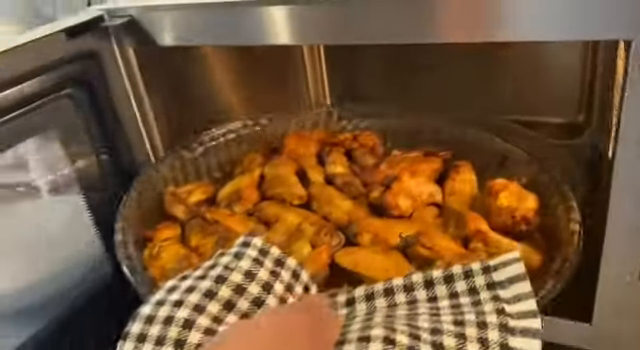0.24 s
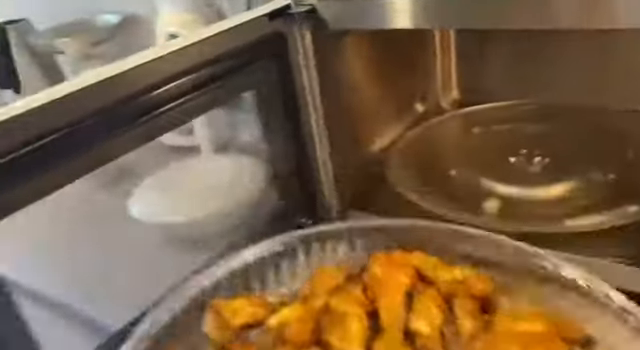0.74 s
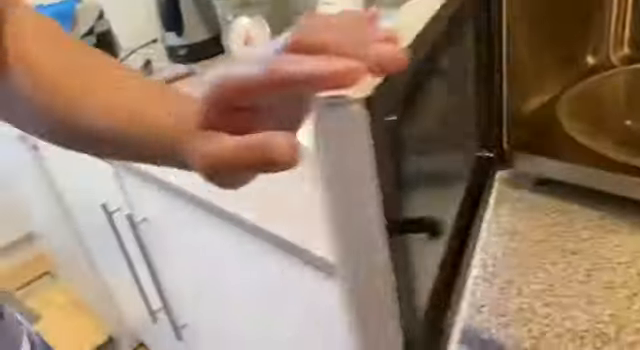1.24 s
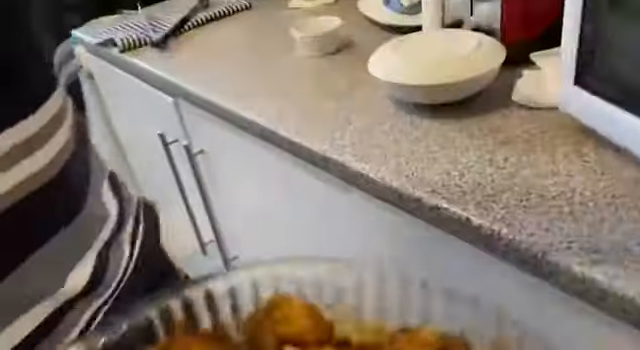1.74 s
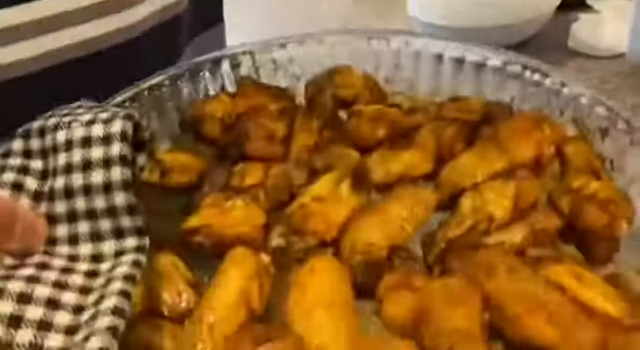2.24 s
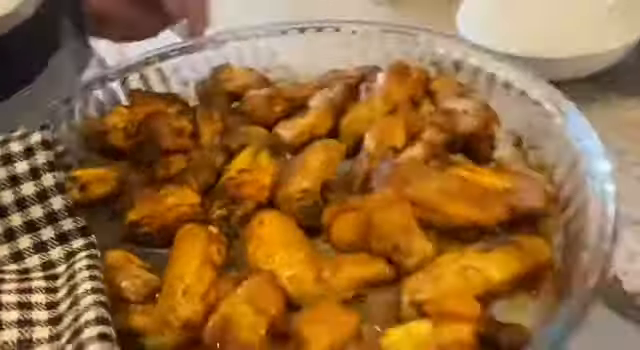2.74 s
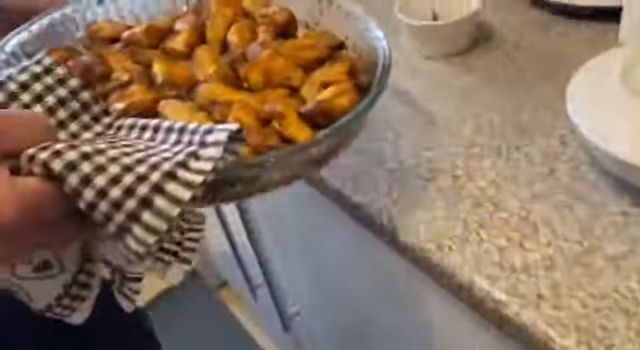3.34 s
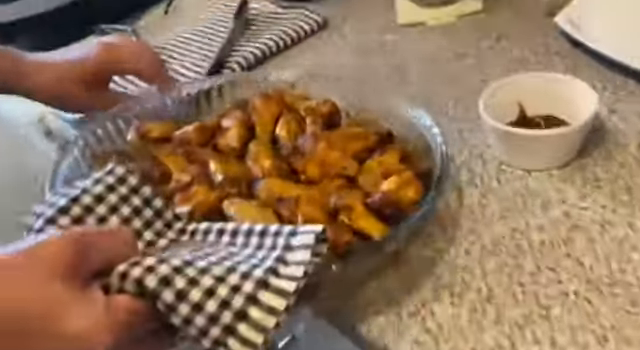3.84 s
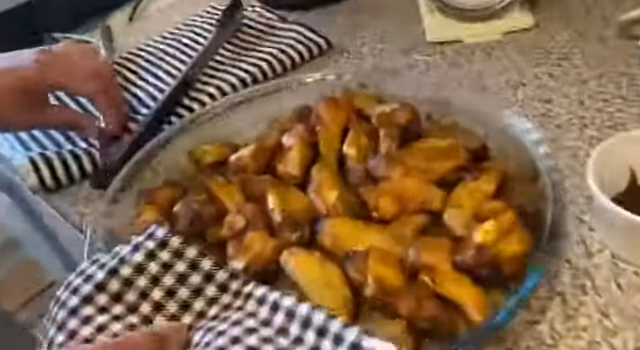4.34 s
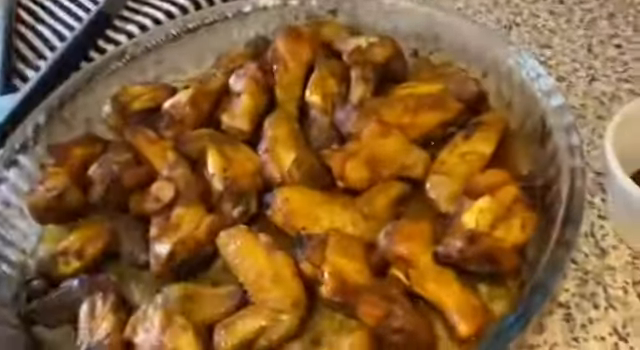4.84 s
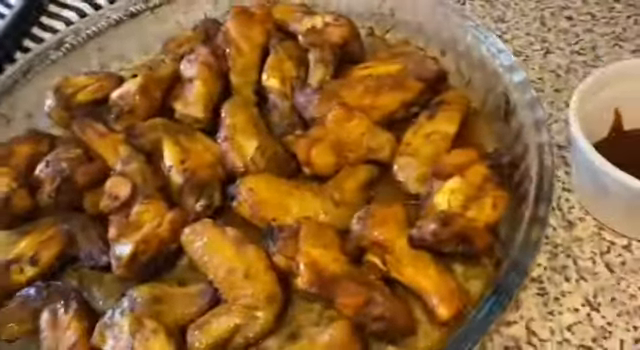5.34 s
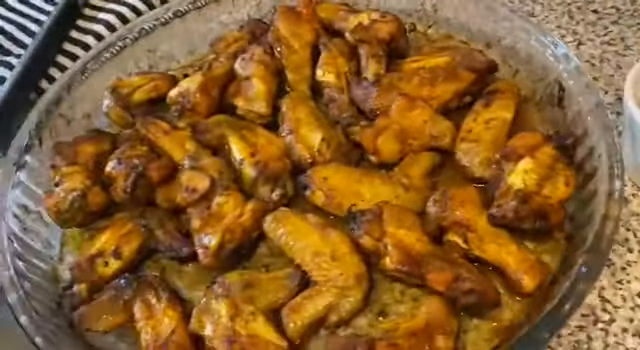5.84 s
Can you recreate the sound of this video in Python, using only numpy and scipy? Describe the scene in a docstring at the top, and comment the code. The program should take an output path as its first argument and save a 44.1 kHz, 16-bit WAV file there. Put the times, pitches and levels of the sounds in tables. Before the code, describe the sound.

A steady wavering microwave fan hum in a kitchen, a hard door clack at two seconds, cloth rustles, then a heavy glass dish knocks onto the worktop.

```python
"""Microwave oven, door and dish

A fan hums in a kitchen, as wavering sines under filtered noise, while a dish is carried from the oven in a cloth.
Soft floor thuds and cloth strokes are swells of noise; small clinks are noise clicks with brief dying sines.
The door's latch, panel and case, and the dish's two knocks on the worktop, are struck modes with a dense clatter.
The dish lands near a corner where the hum booms; a short diffuse tail gives the kitchen's ring."""
import sys
import numpy as np
from scipy import signal
from scipy.fft import rfft, irfft, next_fast_len
from scipy.io import wavfile

SR = 44100
rng = np.random.default_rng(int(sys.argv[2]) if len(sys.argv) > 2 else 0)


def pcm_store(signal):
    """Save signal as 16-bit PCM."""
    levels = np.round(np.clip(np.atleast_2d(signal), -1, 1) * 32767)
    wavfile.write(sys.argv[1], SR, levels.astype(np.int16).T)


N = 268555
EDGE_HZ = 11300  # upper limit of the noise and of the microphones


def amp(db):
    """Level and amplitude: decibels become a linear gain."""
    return 10 ** (np.asarray(db) / 20)


def evened(x):
    """Normalised power: scales a signal to an rms of 1."""
    return x / np.sqrt(np.mean(x ** 2) + 1e-20)


def read(points, hz):
    """Logarithmic pitch scale: interpolates a spectrum against log frequency."""
    f, value = np.transpose(points)
    return np.interp(np.log(hz + 1), np.log(f), value)


def curve(rows):
    """Linear interpolation in time: every column of a time table, sample by sample."""
    s, *columns = np.transpose(rows)
    return [np.interp(np.arange(N) / SR, s, column) for column in columns]


def add(mix, s, sound):
    """Superposition: mixes a stereo sound in at time s."""
    part = mix[:, max(round(s * SR), 0):][:, :sound.shape[1]]
    part += sound[:, :part.shape[1]]


def drift(rate_hz, size):
    """Low-passed random motion: slow noise of rms 1."""
    fast = next_fast_len(size)
    hz = np.fft.rfftfreq(fast, 1 / SR)
    slow = rfft(rng.standard_normal(fast)) / (1 + (hz / rate_hz) ** 4)
    return evened(irfft(slow, fast)[:size])


def decay(t, t60):
    """Exponential decay: a fall of 60 dB in t60 seconds."""
    return np.exp(-np.log(1000) * t / t60)


# Left-right likeness of the noise. Each row: frequency in Hz, correlation from 0 to 1.
LIKENESS = [(60, 0.94), (130, 1), (200, 0.53), (330, 0.69), (600, 0.094), (1200, 0.082), (2500, 0.37),
            (5000, 0.7), (7500, 0.02), (11000, 0.96)]


def noise(spectrum, size, tilt_db=0):
    """Partial coherence: shaped noise whose two channels share a set correlation at each frequency."""
    hz = np.fft.rfftfreq(size, 1 / SR)
    mid, side = rfft(rng.standard_normal((2, size)))
    same = np.clip(read(LIKENESS, hz), -1, 1)
    mid, side = mid * np.sqrt(1 + same), side * np.sqrt(1 - same)
    octaves = np.log2(np.maximum(hz, 1500) / 1500)  # the tilt acts above 1500 Hz
    colour = amp(read(spectrum, hz) + tilt_db * octaves)
    colour = colour * (hz < EDGE_HZ) * hz / (hz + 10)
    return evened(irfft(np.array([mid + side, mid - side]) * colour, size))


# How far echoes lift and dip the rush (dB), and the rough size of one lift (Hz wide, s long).
STANDING_DB, STANDING_HZ, STANDING_S = 2.5, 44, 0.18


def standing_waves(x, size=4096):
    """Interference: wall and cupboard echoes lift and dip narrow bands, shifting as the microphone moves."""
    overlap = size * 3 // 4
    hz, t, z = signal.stft(x, SR, nperseg=size, noverlap=overlap)
    across = np.fft.fftfreq(len(hz), hz[1])[:, None]
    along = np.fft.fftfreq(len(t), t[1])
    smooth = np.exp(-(across * STANDING_HZ) ** 2 * 2 - (along * STANDING_S) ** 2 * 2)
    grid = rng.standard_normal(smooth.shape)
    pattern = evened(np.fft.ifft2(np.fft.fft2(grid) * smooth).real)
    gain = evened(amp(STANDING_DB * pattern))
    return signal.istft(z * gain, SR, nperseg=size, noverlap=overlap)[1][:, :N]


# The walk from the oven to the corner.
# Each row: time in seconds, relative level of the fan's air rush in dB, relative level of the boom in dB.
WALK = [(0.0, -47.5, -46), (0.39, -47.5, -46.5), (1.49, -49.5, -49), (2.26, -51, -44.5), (2.95, -53, -43),
        (4.07, -50, -39.5), (4.71, -53, -37.5), (5.41, -51, -38), (6.09, -55, -39)]
# Spectra of the rush and the corner's boom. Each row: frequency in Hz, relative density in dB per Hz.
AIR_SPECTRUM = [(30, -0.5), (55, -4.5), (130, -11), (220, 1.5), (265, -2.5), (340, 0), (430, 0), (540, 3.5),
                (780, -2), (1100, -4), (1650, -8), (2400, -17), (6000, -29), (11000, -34)]
BOOM_SPECTRUM = [(25, -43), (50, -7), (85, -4.5), (112, -0.5), (138, 4), (170, -2.5), (220, -14),
                 (400, -16), (1000, -70)]


def air(rush_db=8.0, boom_db=-1.5, swirl_db=0.78):
    """Turbulence and room gain: the fan's rush fades with distance; its rumble builds up in the corner."""
    near_db, corner_db = curve(WALK)
    swirl = swirl_db * drift(25, N)
    rush = standing_waves(noise(AIR_SPECTRUM, N)) * amp(rush_db + near_db + swirl)
    boom = noise(BOOM_SPECTRUM, N) * amp(boom_db + corner_db)
    return rush + boom


SHAFT_HZ, MAINS_HZ, DRONE_HZ = 44.87, 49.9, 118.5
# Fan orders heard everywhere. Each row: multiple of the shaft rate, level in dB.
FAN_ORDERS = [(5, -62), (16, -67)]
# Mains hum. Each row: multiple of the mains frequency, level in dB.
MAINS = [(2, -62), (4, -51), (6, -61)]
# Fan orders that stand in the room. Each row: multiple of the shaft rate, relative level in dB
# with the door open, the same with it shut, dB gained per dB of boom.
FAN_STANDING = [(3, -50, -43, 1.0), (4, -40, -50.5, 1.0)]
# The second motor's drone: relative level in dB with the door open, with it shut, dB gained per dB of boom.
DRONE = (-48, -51, 3.04)
# The fan's whine along the walk. Each row: time in seconds, level of the 8th order in dB, of the 12th in dB.
WHINE = [(0, -46, -46), (.4, -50, -51.5), (1.3, -58, -58), (1.9, -61, -58), (2.45, -49.5, -54.5),
         (2.7, -54.5, -45), (3.0, -53.5, -49.5), (3.6, -48, -49.5), (4.1, -52.5, -63.5), (6.09, -53, -66)]
TONE_FALL = 1.1  # dB that the standing tones lose with distance per dB that the rush loses


def hum(waver=0.0015, flutter_db=1.15, wander_turns=0.065):
    """Harmonics and standing waves: shaft, mains and motor lines waver as the microphone moves in the room."""
    t = np.arange(N) / SR
    shaft_turns = SHAFT_HZ * np.cumsum(1 + waver * drift(8.3, N)) / SR
    near_db, corner_db = (level - level.mean() for level in curve(WALK))
    shut = np.clip((t - PANEL_BLOWS[0][0]) * 20, 0, 1)  # from the first panel blow, over 50 ms

    standing = [(DRONE_HZ * t, *DRONE)]
    standing += [(round(k) * shaft_turns, *levels) for k, *levels in FAN_STANDING]
    lines = []
    for cycles, open_db, shut_db, follow in standing:
        door_db = open_db + (shut_db - open_db) * shut
        lines.append((cycles, door_db + TONE_FALL * near_db + follow * corner_db))
    lines += [(round(k) * shaft_turns, db) for k, db in FAN_ORDERS]
    lines += [(round(k) * MAINS_HZ * t, db) for k, db in MAINS]
    lines += [(k * shaft_turns, db) for k, db in zip((8, 12), curve(WHINE))]

    out = np.zeros((2, N))
    for cycles, db in lines:
        phase = cycles + rng.random() + wander_turns * drift(3.9, N)
        gain = np.sqrt(2) * amp(db + flutter_db * drift(7.4, N))
        tone = gain * np.sin(2 * np.pi * phase)
        out += [np.roll(tone, shift=round(SR * 0.00032)), tone]  # reaches the right side first
    return out


# Soft footfalls. Each row: middle in seconds, Gaussian half-length in seconds, level in dB.
STEPS = [(0.782, .05, -48), (2.271, 0.051, -52), (3.316, 0.079, -47)]
# Spectrum of a footfall. Each row: frequency in Hz, relative density in dB per Hz.
FLOOR_SPECTRUM = [(20, -20), (45, 12), (75, -10), (150, -45), (600, -51)]


def footfalls():
    """Low-frequency impact: soft thuds as the floor takes the weight."""
    out = np.zeros((2, N))
    t = np.arange(SR // 2) / SR - 1 / 4
    for s, half, db in STEPS:
        swell = amp(db) * np.exp(-(t / half) ** 2 / 2)
        add(out, s + t[0], noise(FLOOR_SPECTRUM, len(t)) * swell)
    return out


# Cloth strokes, the firm ones mostly darker. Each row: middle in seconds, Gaussian half-length in seconds,
# relative level in dB, treble tilt in dB per octave, left minus right in dB.
RUSTLES = [(1.17, 0.03, -53, -2, -1), (1.91, 0.06, -51.5, -2, -1), (2.355, .04, -57.5, 1.5, 2),
           (2.422, 0.014, -61, 10, 1), (2.703, 0.045, -44.5, -4, 1.5), (2.888, 0.011, -53.5, -2, 2),
           (2.936, 0.023, -53, -2, 1), (3.027, 0.025, -51, -1, 1), (3.121, 0.024, -57.5, 2, 0),
           (3.23, 0.022, -58.5, 3, 2), (3.35, 0.017, -56, 2.5, 0), (3.465, 0.021, -47, -2.5, 1),
           (3.541, .012, -41, -11.5, -4), (3.574, 0.023, -42, -3.5, 1.5), (3.625, 0.015, -52, -3, -1),
           (3.684, 0.025, -48.5, -2.5, 3), (3.74, 0.019, -55, 0, 3), (4.069, 0.015, -50.5, 1, -3),
           (4.144, 0.016, -47, -4.5, -2), (4.185, 0.032, -48.5, -2.5, -2), (4.319, 0.012, -41, -7, -2),
           (4.4, 0.026, -47, -5.5, 1), (4.627, 0.035, -57, 4.5, 1), (4.954, .024, -52.5, 2.5, 1)]
# Spectrum of the cloth, and of the small clicks. Each row: frequency in Hz, relative density in dB per Hz.
CLOTH_SPECTRUM = [(200, 0), (700, -1), (1600, -0.5), (2400, 2.5), (4200, 1.5), (6500, -2.5), (11000, -6.5)]


def cloth(grain_db=1.5, catches_per_s=260, catch_db=0):
    """Stick-slip friction: swells of fibre hiss are roughened by threads that catch and let go."""
    out = np.zeros((2, N))
    t = np.arange(SR // 2) / SR - 1 / 4
    for s, half, db, tilt_db, left_db in RUSTLES:
        swell = np.exp(-(t / half) ** 2 / 2) * amp(db + grain_db * drift(180, len(t)))
        catches = (rng.random(len(t)) < catches_per_s / SR) * rng.random(len(t))
        snaps = signal.lfilter([1], [1, -np.exp(-1500 / SR)], catches)  # each catch dies away
        roughness = 1 + amp(catch_db) * snaps
        stroke = noise(CLOTH_SPECTRUM, len(t), tilt_db) * swell * roughness
        add(out, s + t[0], stroke * amp([[left_db / 2], [-left_db / 2]]))
    return out


def ring(modes, t):
    """Modal vibration: a struck object sounds as a sum of dying sines."""
    return sum(amp(db) * decay(t, t60) * np.sin(2 * np.pi * hz * t) for hz, db, t60 in modes)


# Small clinks of utensils and glass. Each row: start in seconds, relative level in dB,
# relative level of the ring in dB.
TICKS = [(0.7456, -27, -20), (3.005, -37, -23), (4.069, -42, -1), (4.139, -29, -18), (4.312, -36, 5),
         (4.321, -36.5, 5), (4.33, -38, 2), (4.374, -29.5, -15), (4.389, -26, -4.5), (4.507, -28.5, -13),
         (5.475, -35, -19)]
# The brief ring of a clink. Each row: frequency in Hz, relative level in dB, t60 in seconds.
CLINK_MODES = [(4200, -12, 0.027), (5570, -20, 0.049), (6970, -25, 0.063)]


def ticks(t60=0.0033, tilt_db=3):
    """Transient excitation: tiny bright clicks set off a brief modal ring, strong or faint."""
    out = np.zeros((2, N))
    t = np.arange(SR // 10) / SR
    for s, db, ring_db in TICKS:
        click = noise(CLOTH_SPECTRUM, len(t), tilt_db) * decay(t, t60) / 2
        add(out, s, amp(db) * (click + amp(ring_db) * ring(CLINK_MODES, t)))
    return out


CRACK_T60 = 0.018  # seconds for the first crack of a blow to die away


def strike(blows, modes, clatter, clatter_db, clatter_t60, crack_db, side_db):
    """Impact excitation: a blow cracks, then rings; its weight and hardness set the band that moves."""
    out = np.zeros((2, N))
    t = np.arange(SR // 2) / SR
    tones = ring(modes, t)
    fade = amp(clatter_db) * decay(t, clatter_t60) + amp(crack_db) * decay(t, CRACK_T60)
    for s, db, low_hz, high_hz in blows:
        dense = noise(clatter, len(t)) * fade
        weight = signal.butter(3, min(low_hz, SR / 3), "high", fs=SR, output="sos")
        hardness = signal.butter(6, min(high_hz, SR / 3), fs=SR, output="sos")
        add(out, s, amp(db) * signal.sosfilt(np.vstack([weight, hardness]), tones + dense))
    return out * amp([[side_db], [-side_db]])  # left up, right down by as much


# Modes of door and case. Each row: frequency in Hz, relative level in dB, t60 in seconds.
DOOR_MODES = [(62.4, -2, 0.089), (159.4, -6.5, 0.143), (193.6, -12.5, 0.1), (218.4, -23.5, 0.23),
              (384, -33, 0.13), (390, -6.5, 0.055), (720, -38, 0.086), (799, -7, 0.066), (834, -30, 0.12),
              (1070, -31, 0.12), (1106, -24, 0.26), (1273, -34, 0.19), (1440, -30, 0.22), (1502, -32, 0.28),
              (1560, -35, 0.14), (2330, -38, 0.07), (2434, -26, 0.08), (2630, -18, 0.079),
              (3000, -31, 0.061), (3240, -22.5, 0.11), (3370, -29, .11), (3620, -31, 0.1),
              (4320, -32, 0.059), (5250, -31, 0.087)]
# Their dense clatter. Each row: frequency in Hz, relative density in dB per Hz.
DOOR_CLATTER = [(50, 8.5), (150, -5), (300, 2), (480, 4), (800, 2), (1150, 0), (1700, -1), (2300, -3.5),
                (4000, -7.5), (5500, -11.5), (7500, -14.5), (11000, -7.5)]
# The latch hooks touch, ride up, snap in and rattle. Each row: start in seconds, relative level in dB.
LATCH_CLICKS = [(2.01, -15.5), (2.018, -21), (2.026, -23), (2.034, -13), (2.043, -10), (2.0473, -6.5),
                (2.082, -21.5)]
# The panel meets the frame and chatters. Each row: start in seconds, relative level in dB.
PANEL_BLOWS = [(2.0436, -4.5), (2.0629, -15), (2.069, -19), (2.084, -28), (2.094, -24), (2.106, -21.5),
               (2.131, -36), (2.204, -32)]
# The case is nudged, takes the slam and rocks to rest, duller at the end.
# Each row: start in seconds, relative level in dB, highest frequency in Hz.
CASE_THUDS = [(2.018, -14, 523), (2.0497, -3, 525), (2.0547, -10, 564), (2.109, -20, 625),
              (2.149, -21, 260), (2.178, -36, 250), (2.219, -23.5, 303)]
# Bands that latch and panel set moving: lowest and highest frequency in Hz.
LATCH_HZ = (920, 10060)
PANEL_HZ = (407, 3000)
CASE_LOW_HZ = 119  # the case hardly moves below this pitch


def door():
    """Band-limited impact: latch, panel and case blows excite one set of door modes in different bands."""
    blows = [(s, db, *LATCH_HZ) for s, db in LATCH_CLICKS]
    blows += [(s, db, *PANEL_HZ) for s, db in PANEL_BLOWS]
    blows += [(s, db, CASE_LOW_HZ, high_hz) for s, db, high_hz in CASE_THUDS]
    return strike(blows, DOOR_MODES, DOOR_CLATTER,
                  clatter_db=-8.0, clatter_t60=0.13, crack_db=-9.5, side_db=-0.5)


# Modes of the loaded dish on the worktop. Each row: frequency in Hz, relative level in dB, t60 in seconds.
DISH_MODES = [(116, -10, .165), (160, -19, .14), (230, -18, .2), (330, -15, .12), (398, -19, .12),
              (440, -6, .03), (478, -20, .1), (600, -2, .016), (662, -27, .14), (705, -19, .075),
              (778, -24, .13), (910, -23, .08), (1040, -9, .024), (1421, -29, .1), (2020, -22, .06)]
# Their dense clatter. Each row: frequency in Hz, relative density in dB per Hz.
DISH_CLATTER = [(50, 13), (130, 7.5), (250, -1.5), (550, 3), (1150, 5), (1600, 0), (2200, -13), (4000, -21),
                (11000, -20)]
# The dish lands on one edge, then more softly on the other; each landing runs from rim to bowl to worktop,
# then it settles. Each row: start in seconds, relative level in dB, lowest and highest frequency in Hz.
KNOCKS = [(3.847, -15.5, 2000, 6170), (3.8473, -7.5, 1020, 2500), (3.8493, -1.5, 420, 850),
          (3.853, -14.5, 1700, 3500), (3.8545, -1, 90, 185), (3.868, -16.5, 400, 1200),
          (3.879, -18, 400, 1300), (3.891, -25, 594, 2200), (3.915, -29.5, 400, 1200),
          (4.3902, -4, 850, 960), (4.3935, -3, 229, 380), (4.3955, -2, 75, 182), (4.412, -24, 200, 444),
          (4.428, -18, 189, 337)]
# Light taps on the glass. Each row: start in seconds, relative level in dB.
TAPS = [(2.6325, -20), (2.639, -23), (2.649, -22), (2.664, -33)]
# Band of the taps: lowest and highest frequency in Hz.
TAP_HZ = (1450, 2700)


def dish():
    """Coupled modes: knocks and light taps excite the loaded dish, the knocks the worktop too."""
    blows = KNOCKS + [(s, db, *TAP_HZ) for s, db in TAPS]
    return strike(blows, DISH_MODES, DISH_CLATTER,
                  clatter_db=-9, clatter_t60=0.081, crack_db=-12.0, side_db=0.1)


# The kitchen's ring. Each row: frequency in Hz, t60 in seconds.
KITCHEN_RING = [(100, 0.52), (200, 0.9), (500, 0.3), (1500, 0.36), (4000, 0.41), (11000, 0.31)]


def kitchen(x, first_s=0.0039):
    """Diffuse reverberation: a short tail from tiles and cupboards, each band dying at its own speed."""
    flat = noise([(100, 0), (11000, 0)], SR // 2)
    hz, t, z = signal.stft(flat, SR, nperseg=256)
    fading = z * decay(t, read(KITCHEN_RING, hz)[:, None])
    tail = signal.istft(fading, SR, nperseg=256)[1]
    tail *= np.clip(np.arange(tail.shape[1]) / SR / first_s - 1, 0, 1)  # silent until first_s
    return signal.fftconvolve(x, tail / np.linalg.norm(tail[0]), axes=1)[:, :N]


RADIATE_HZ = 261  # the dish radiates into the room above this pitch


def scene():
    """Direct and reverberant sound: the dish's deep thud stays in the worktop and hardly reaches the walls."""
    door_sound, dish_sound = door(), dish()
    small = cloth() + ticks()
    radiation = signal.butter(2, RADIATE_HZ, "high", fs=SR, output="sos")
    radiated = signal.sosfilt(radiation, dish_sound)
    room = kitchen(amp(-14.0) * door_sound + amp(-12.5) * radiated + amp(-9.0) * small)
    return hum() + air() + footfalls() + door_sound + dish_sound + small + room


# Unlike microphones. Each row: frequency in Hz, left minus right in dB.
LEAN = [(60, 5.5), (140, -0.5), (340, 0.5), (820, 0.5), (1970, 1.0), (4720, 4), (11300, -0.5)]
# The treble notch: lower and upper edge in Hz.
NOTCH_HZ = (7950, 8900)
PORT_LEAD_S = 1.6e-5  # sound reaches the left microphone this much sooner


def record(dry):
    """Transduction: two unlike microphones a little apart, soft clipping, then a treble notch and band limit."""
    hz = np.fft.rfftfreq(N, 1 / SR)
    left = amp(read(LEAN, hz) / 2) * np.exp(1j * np.pi * hz * PORT_LEAD_S)
    heard = irfft(rfft(dry) * np.array([left, 1 / left]), N)
    rounded = heard / (1 + (heard / .85) ** 6) ** (1 / 6)  # rounds the tallest peaks
    passband = signal.firwin(301, [*NOTCH_HZ, EDGE_HZ], pass_zero=True, window=("kaiser", 8), fs=SR)
    return signal.oaconvolve(rounded, passband[None], "same")


dry = scene()
out = record(dry)
pcm_store(out)
```